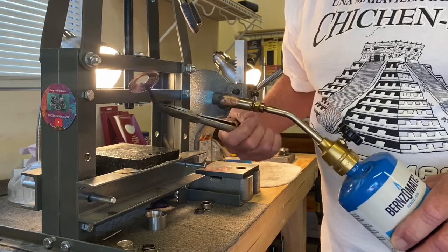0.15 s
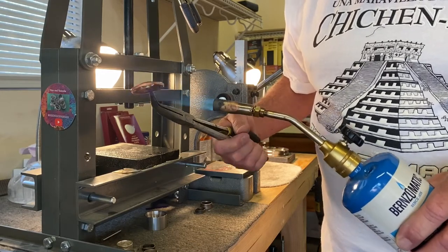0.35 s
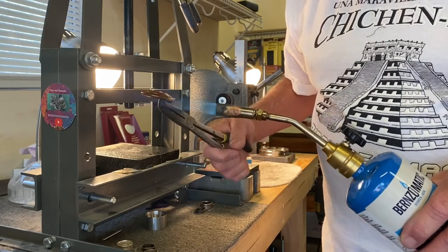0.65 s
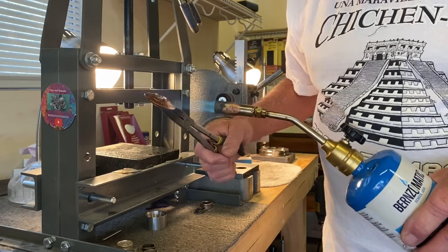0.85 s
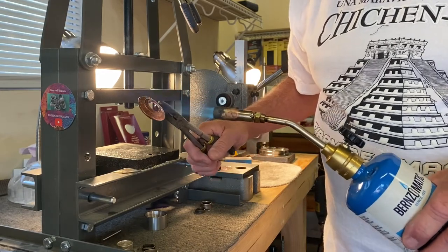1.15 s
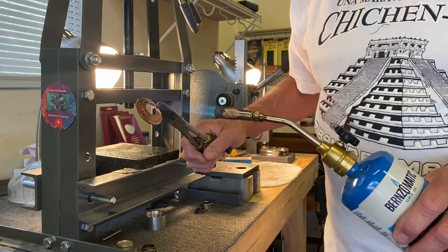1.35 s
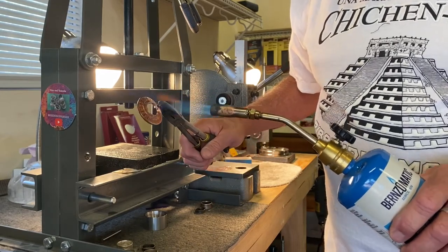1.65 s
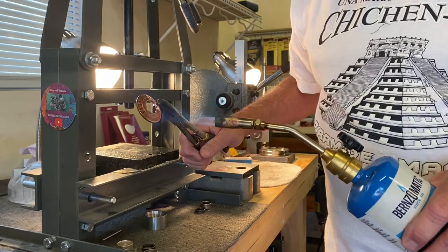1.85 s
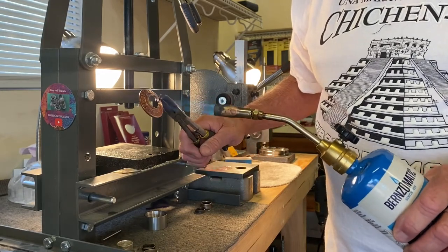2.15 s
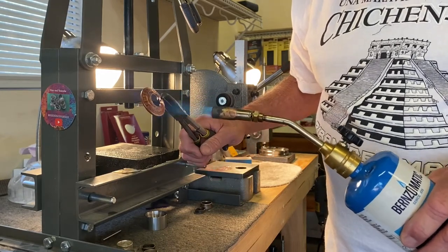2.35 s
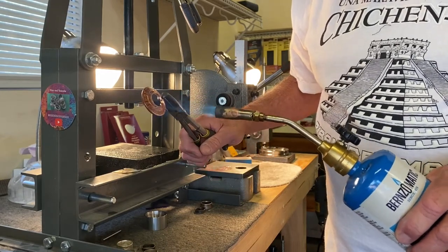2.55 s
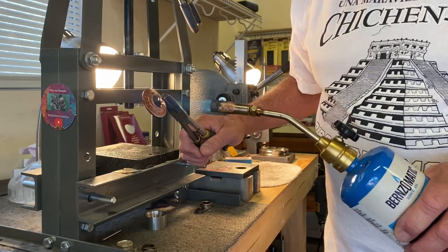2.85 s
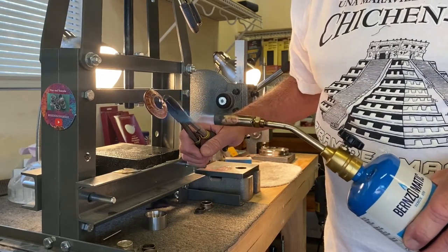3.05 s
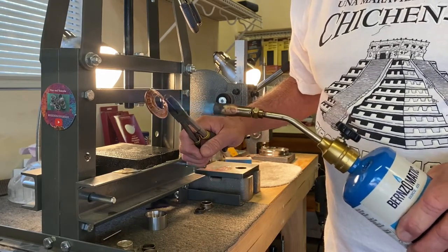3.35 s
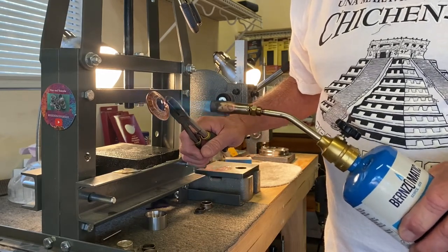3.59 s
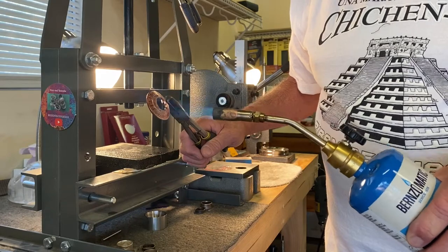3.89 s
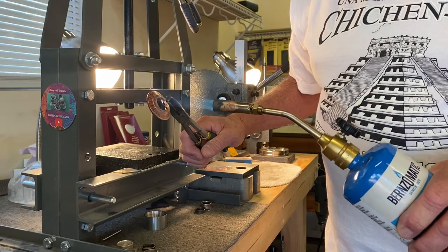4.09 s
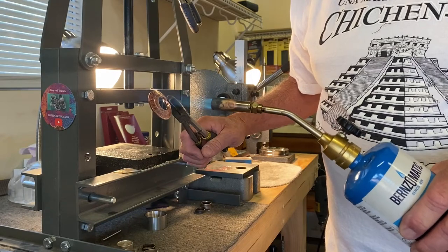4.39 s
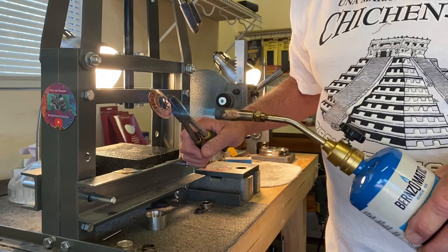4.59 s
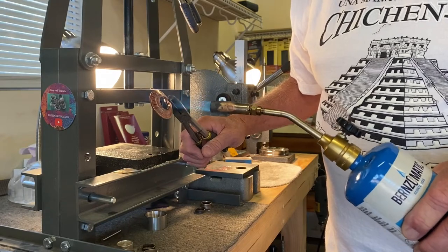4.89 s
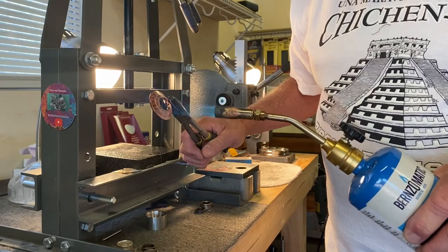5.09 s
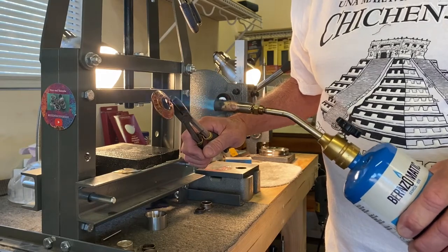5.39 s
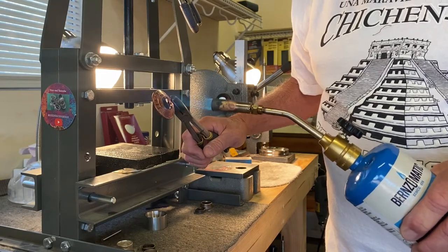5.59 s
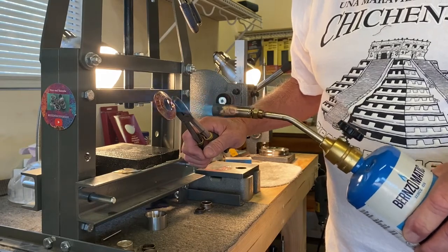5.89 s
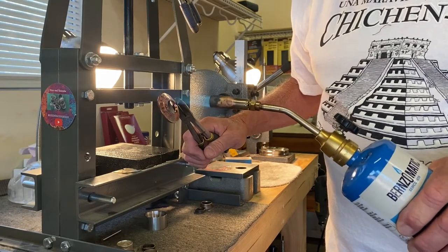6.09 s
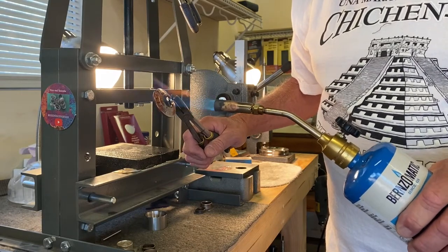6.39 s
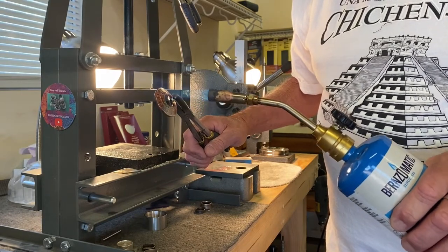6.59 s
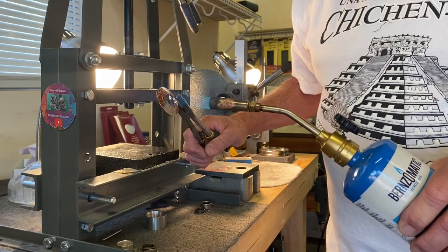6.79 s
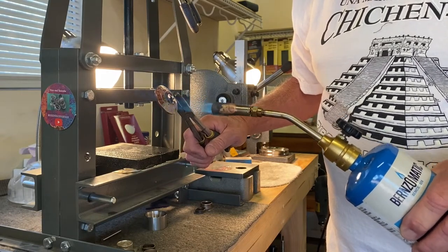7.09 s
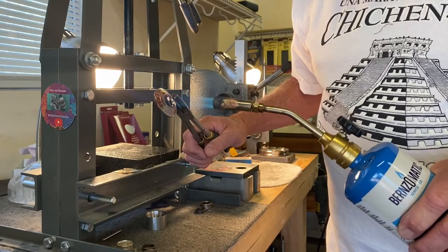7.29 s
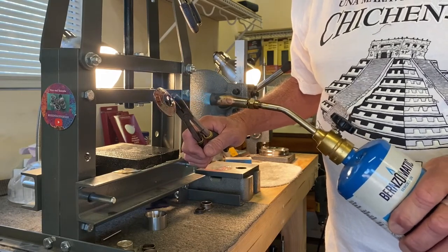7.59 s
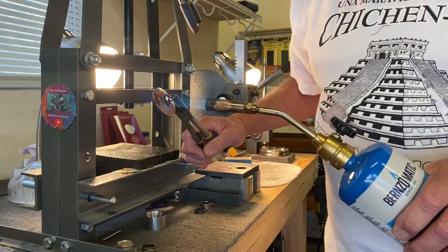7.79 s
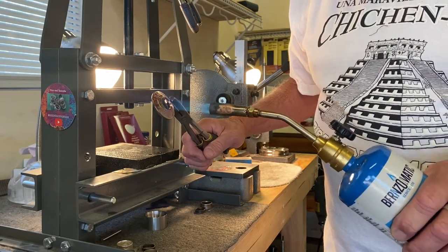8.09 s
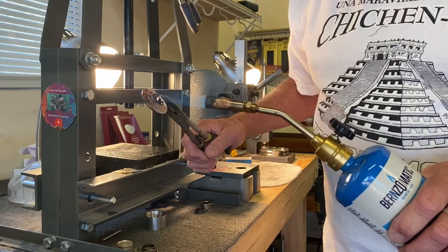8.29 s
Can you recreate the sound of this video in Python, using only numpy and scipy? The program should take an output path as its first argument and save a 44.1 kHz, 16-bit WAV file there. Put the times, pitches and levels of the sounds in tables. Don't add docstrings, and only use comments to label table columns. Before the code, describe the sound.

Steady torch flame, already burning at the start and still burning at the end. Low rumble and quick uneven flutter sit under a dense airy hiss with narrow, almost whistling resonances. The opening is fuller and duller, then settles; tiny puffs and brightened breaks come now and then. Heard from a metre away by a two-port phone, with subtle bench and wall reflections.

```python
import sys
import numpy as np
from scipy import signal
from scipy.fft import rfft, irfft
from scipy.io import wavfile
from scipy.ndimage import uniform_filter1d, map_coordinates

SR = 44100
rng = np.random.default_rng(int(sys.argv[2]) if len(sys.argv) > 2 else 0)


def file_out(sig):
    cols = np.atleast_2d(sig).T
    lim = np.clip(cols, -1, 1)
    pcm = np.round(lim * 32767).astype(np.int16)
    wavfile.write(sys.argv[1], SR, pcm)


def how_loud(loudness_db):
    steps = np.asarray(loudness_db, float) / 20
    return 10 ** steps


N = 372644
HZ = np.fft.rfftfreq(N, 1 / SR)

# frequency in Hz, echo minus direct in dB.
WALL_ECHO = [(60, -17), (250, -14), (600, -4), (1700, -2), (2900, -9), (4800, 3), (6000, -12), (7500, -14),
             (9200, -24), (10500, -6), (11500, -9), (12400, -22), (13800, -6), (15200, -12)]
# delay in seconds, level in dB.
BENCH_ECHO = [(.0023, -20), (.0035, -21)]
# frequency in Hz, left lead in radians.
PORT_LEAD = [(100, 0), (1700, -.4), (2800, -1.1), (4900, -.8), (6100, -.1), (7300, .43), (8700, .03),
             (10800, .17)]
# frequency in Hz, left minus right in dB.
PORT_BALANCE = [(100, 1.4), (1000, -0.9), (2200, 0.5), (3000, -2), (5500, -6.5), (6000, -5), (6900, -0.5),
                (7300, 3), (8800, 1.9), (15000, 1)]
# frequency in Hz, density in dB per Hz.
JET_SPECTRUM = [(800, -26.5), (1500, -25.5), (2300, -22.5), (3600, -25), (4700, -26.5), (5800, -24),
                (6700, -16), (8500, -13), (9500, -15), (11000, -23.5), (12100, -19), (13800, -23),
                (15200, -21.5), (16000, -26.5)]
# frequency in Hz, width in Hz, boost in dB.
TUBE_MODES = [(2764, 890, 6), (2972, 630, 10), (2988, 27, 2.5), (3430, 500, 3), (5340, 150, 4),
              (6050, 230, 3), (6860, 270, 3.5), (7180, 570, 4.5), (7514, 510, 11), (8190, 630, 8)]
# frequency in Hz, density in dB per Hz.
ROAR_SPECTRUM = [(20, -45), (40, -14), (55, -4), (150, -6.5), (300, -4), (400, -12.5), (800, -13.5),
                 (1300, -21.5), (2000, -27.5), (4000, -40)]
# frequency in Hz, width in Hz, boost in dB.
ROOM_MODES = [(62, 24, 4), (118.6, 16, 6.5), (201.3, 30, 5.5), (226, 35, 3), (580, 18, 2.5),
              (614, 46, -5.5), (712, 103, 4.5), (809, 85, -7), (955, 55, 0.4), (1126, 200, 3)]
# time in seconds, peak in dB, pitch in Hz.
GAS_POCKETS = [
    (1.88, -30, 170),
    (2.57, -31, 180),
    (5.006, -26, 120),
    (5.8, -32, 200),
    (6.135, -36, 800),
    (7.95, -29, 210),
]
# time in seconds, roar swell in dB, brightening in dB.
SURGES = [
    (0, 5, -4),
    (1.9, 1.5, -2),
    (2.57, 2.3, -1),
    (4.98, 1, 2.5),
    (5.8, 2.3, -2),
    (6.13, -0.5, 3.5),
    (7.4, 1, 0),
    (7.95, -3, 3.5),
    (8.3, 2, -3.5),
]


def table(rows):
    hz, value = np.transpose(rows)
    return np.interp(np.log(HZ + 1), np.log(hz), value)


def bumps(modes):
    return sum(db / (1 + (2 * (HZ - hz) / width) ** 2) for hz, width, db in modes)


def colour(x, db):
    y = irfft(rfft(x) * how_loud(db), N)
    return y / y.std()


def walk(rate):
    hold = int(SR / rate)
    w = np.repeat(rng.standard_normal(N // hold + 1), hold)
    w = uniform_filter1d(uniform_filter1d(w, hold), hold)[:N]
    w = w - uniform_filter1d(w, 4 * hold)
    return w / w.std()


def flicker(x, centres_hz, shared_db, own_db, rate):
    place = np.interp(np.log(HZ + 1), np.log(centres_hz), np.arange(len(centres_hz)))
    spectrum = rfft(x)
    total = 0
    for k in range(len(centres_hz)):
        band = irfft(spectrum * np.clip(1 - abs(place - k), 0, 1), N)
        total = total + band * how_loud(shared_db + own_db * walk(rate))
    return total


def wall_tail():
    t = np.arange(SR // 2) / SR
    tail = rng.standard_normal(len(t)) * np.exp(-np.log(1000) * t / .25) * (t > .004)
    return tail / np.linalg.norm(tail)


def workshop(x):
    poses = 6
    pose = np.linspace(0, poses - 1, N)
    wet = how_loud(table(WALL_ECHO))
    source = rfft(x) / np.sqrt(1 + wet ** 2)
    port_lag_s, lag_from_hz = .000159, 6100
    lag = 2 * np.pi * port_lag_s * np.maximum(HZ - lag_from_hz, 0)
    lead = table(PORT_LEAD) + lag - .2 * np.sin(2 * lag)
    ports = []
    for side, (delay_s, echo_db) in zip((.5, -.5), BENCH_ECHO):
        heard = source * how_loud(side * table(PORT_BALANCE))
        direct = np.exp(1j * side * lead)
        bench = how_loud(echo_db) * np.exp(-2j * np.pi * HZ * delay_s) / (1 + (HZ / 2500) ** 2)
        port = irfft(heard * (direct + bench), N)
        for k in range(poses):
            fade = np.sin(np.pi / 2 * np.clip(1 - abs(pose - k), 0, 1))
            port = port + fade * irfft(heard * wet * rfft(wall_tail(), N), N)
        ports.append(port)
    return np.array(ports)


def jet(hiss_db, tube_hz):
    hiss = colour(rng.standard_normal(N), table(JET_SPECTRUM) + bumps(TUBE_MODES))
    bands_hz = [1800, 3000, 4000, 5000, 6200, 7000, 7600, 8300, 9500, 11000, 12500, 14500]
    hiss = flicker(hiss, bands_hz, .25 * walk(32), .85, 34)
    speed = tube_hz / tube_hz.mean() * (1 + .002 * walk(8))
    place = np.cumsum(speed / speed.mean())
    return how_loud(hiss_db + 4.0) * map_coordinates(hiss, [place], order=5, mode="wrap")


def puffs_of_gas():
    t = np.arange(N) / SR
    thumps = np.zeros(N)
    for at_s, db, hz in GAS_POCKETS:
        swell = np.exp(-((t - at_s) * hz / 0.7) ** 2)
        thumps += how_loud(db) * np.sin(2 * np.pi * hz * (t - at_s)) * swell
    return thumps


def flame(roar_db, bright_db):
    upper_share = np.clip(HZ / 250 - 1.2, 0, 1)
    even, puffs = rng.standard_normal((2, N))
    flutter_db = 2.2 * walk(250) + 1.1 * walk(24)
    puffs = puffs * how_loud(flutter_db + bright_db - bright_db.mean())
    low = rfft(even) * np.sqrt(1 - upper_share)
    high = rfft(puffs) * np.sqrt(upper_share)
    roar = colour(irfft(low + high, N), table(ROAR_SPECTRUM) + bumps(ROOM_MODES))
    roar = flicker(roar, [60, 130, 280, 600, 1200, 2500], .4 * walk(16), .6, 18)
    return how_loud(roar_db + 2.5) * roar + puffs_of_gas()


def scene():
    t = np.arange(N) / SR
    at_s, swell_db, brighten_db = np.transpose(SURGES)
    surge = np.exp(-((t - at_s[:, None]) / .07) ** 2)
    roar_db = -41 + 0.0578 * t + swell_db @ surge
    bright_db = 0.22 * t + brighten_db @ surge
    cold_hz, warm_hz, settle_at_s, settle_s = 7340, 7458, .9, .2
    warmth = .5 + .5 * np.tanh((t - settle_at_s) / settle_s)
    tube_hz = cold_hz + (warm_hz - cold_hz) * warmth
    return workshop(flame(roar_db, bright_db) + jet(-42, tube_hz))


def thin_out(x, from_hz, depth, floor_db):
    hz, _, cells = signal.stft(x, SR, nperseg=2048)
    power = abs(cells) ** 2 + 1e-18
    near = uniform_filter1d(uniform_filter1d(power, size=3, axis=-1), size=4, axis=-2)
    around = uniform_filter1d(uniform_filter1d(power, size=11, axis=-1), size=24, axis=-2)
    strength = depth * np.clip(hz / from_hz - 1, 0, 1)[:, None]
    gain = np.clip((near / around) ** strength, how_loud(floor_db), 1.15)
    return signal.istft(cells * gain, SR, nperseg=2048)[1][:, :N]


def top_cut(x):
    return signal.sosfilt(signal.butter(12, 15800, fs=SR, output="sos"), x)


def record(dry):
    to_sum_difference = np.array([[1, 0.96], [1, -1.078]]) / np.sqrt(2)
    thinned = thin_out(to_sum_difference @ dry, from_hz=2000, depth=.3, floor_db=-17)
    mix = to_sum_difference @ thinned
    return top_cut(mix)


dry = scene()
out = record(dry)
file_out(out)
```